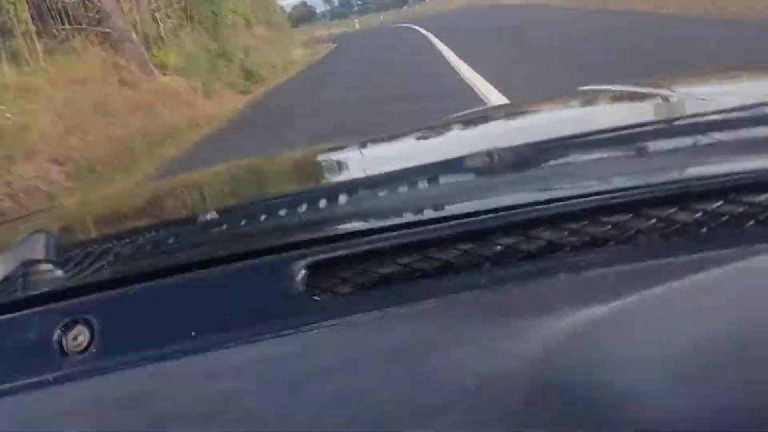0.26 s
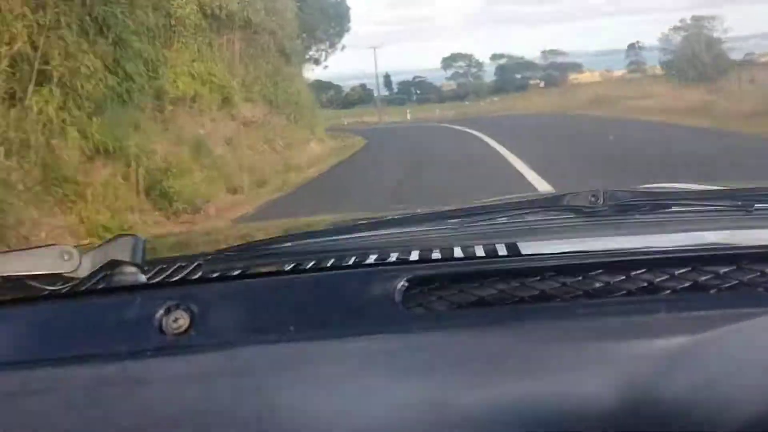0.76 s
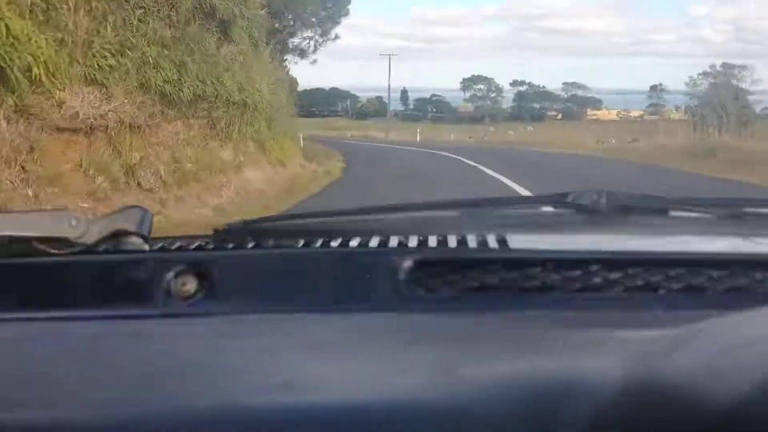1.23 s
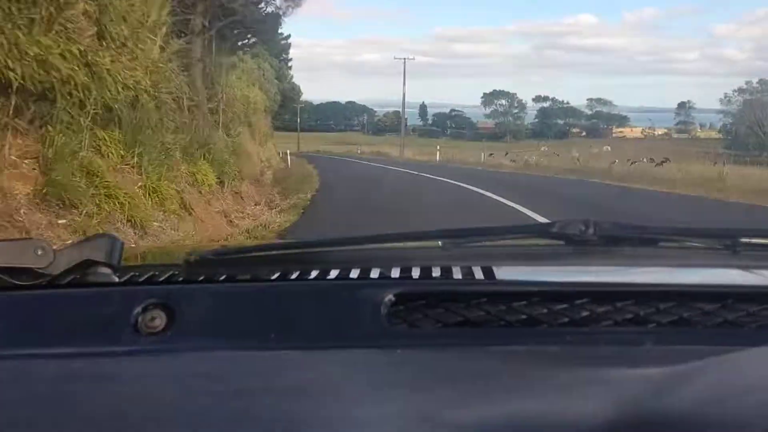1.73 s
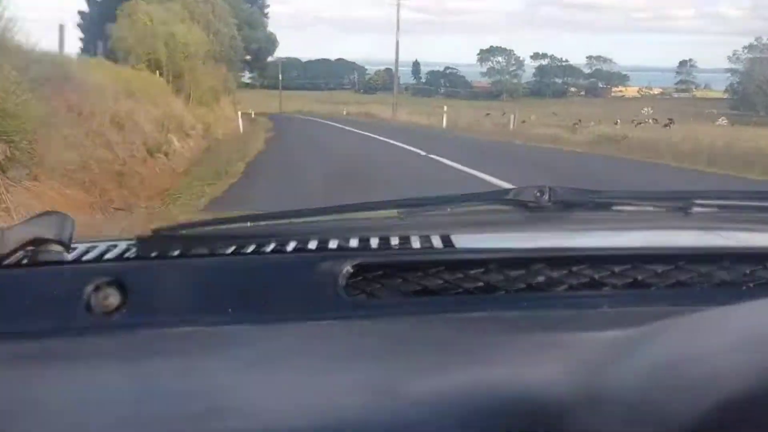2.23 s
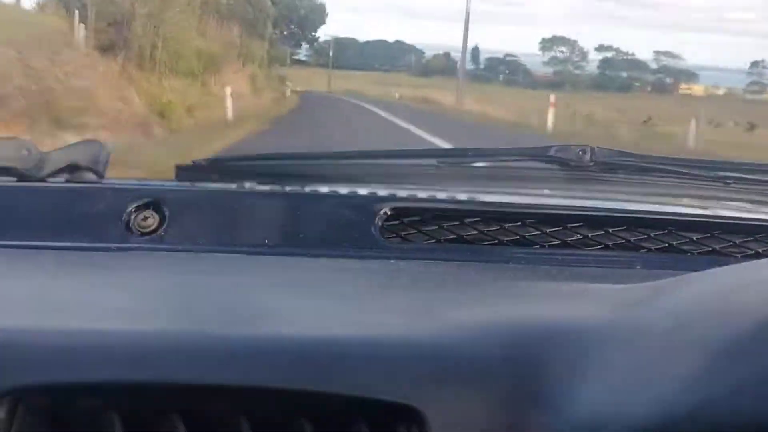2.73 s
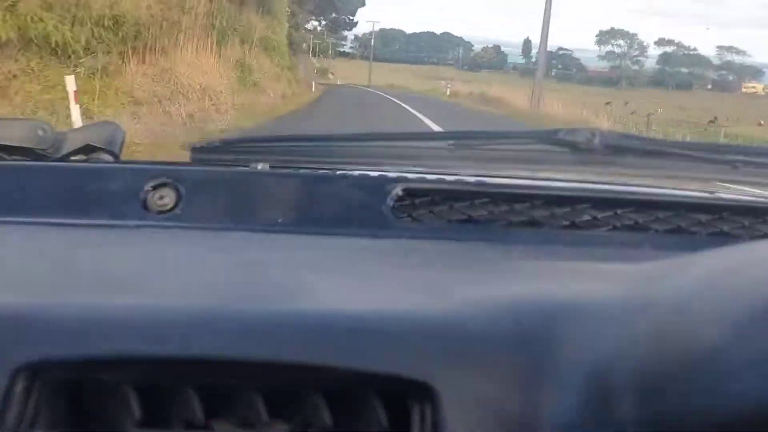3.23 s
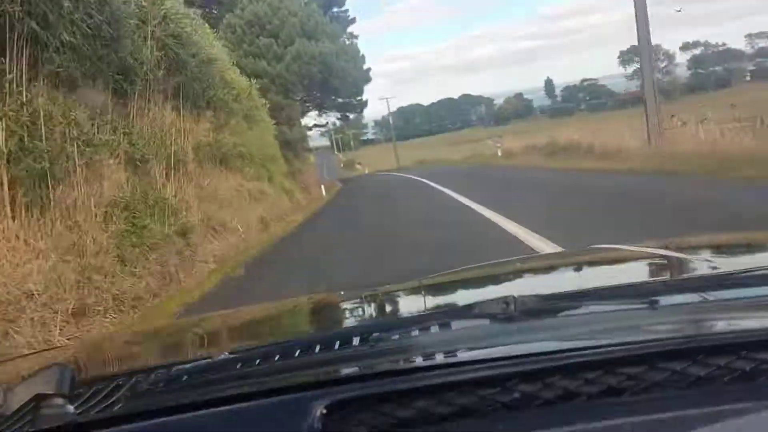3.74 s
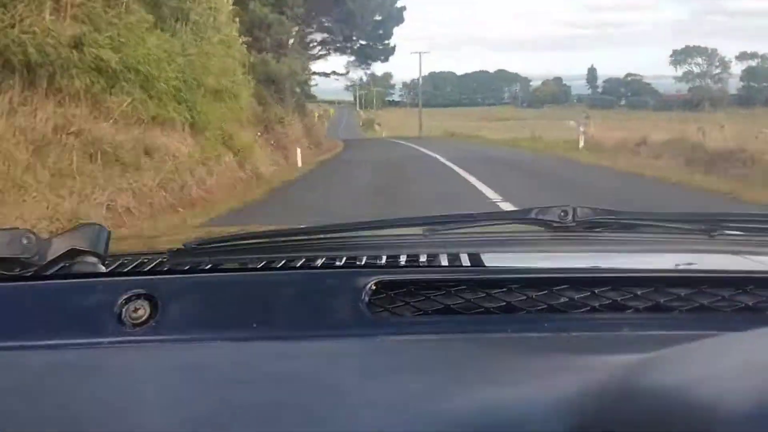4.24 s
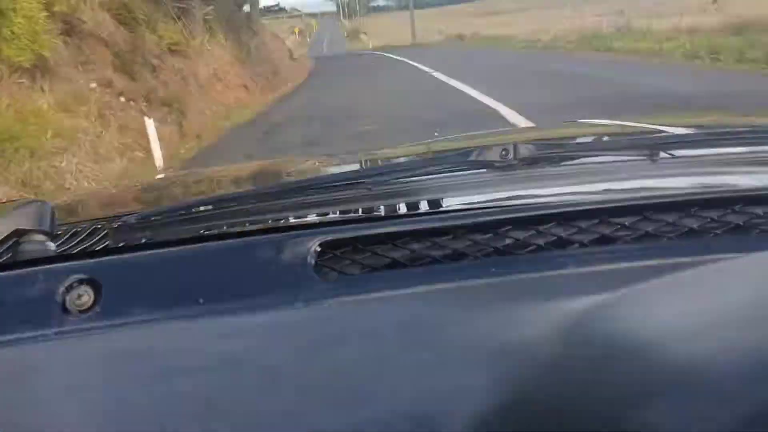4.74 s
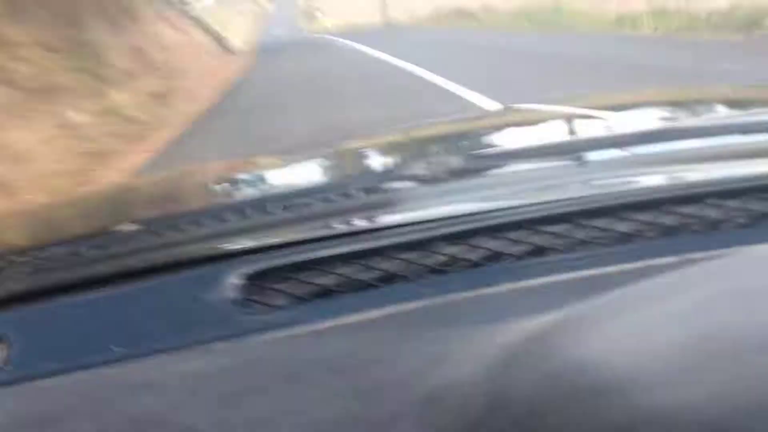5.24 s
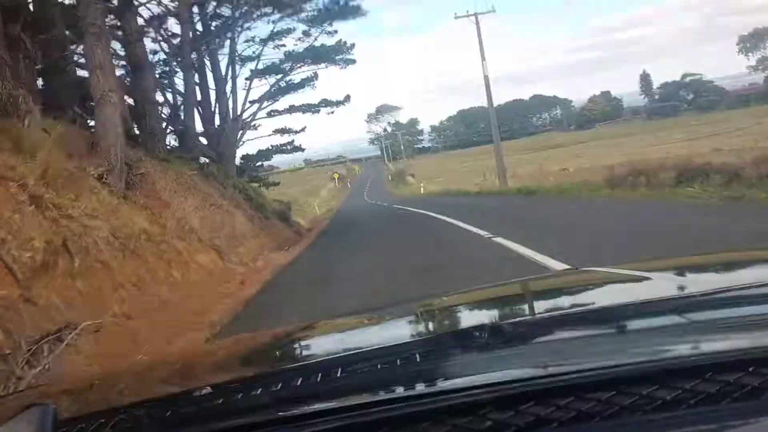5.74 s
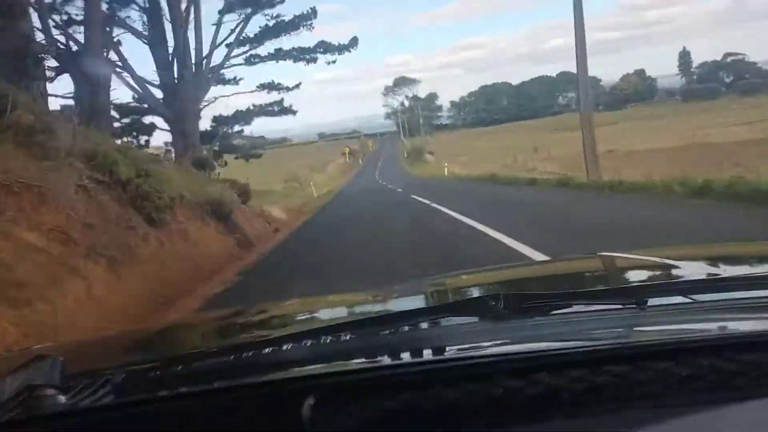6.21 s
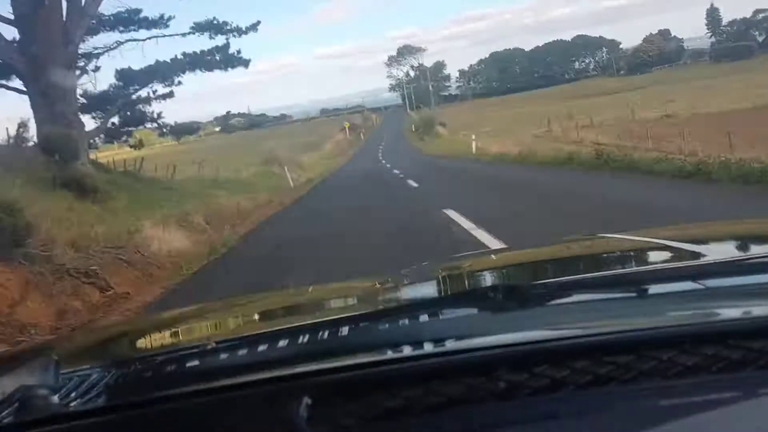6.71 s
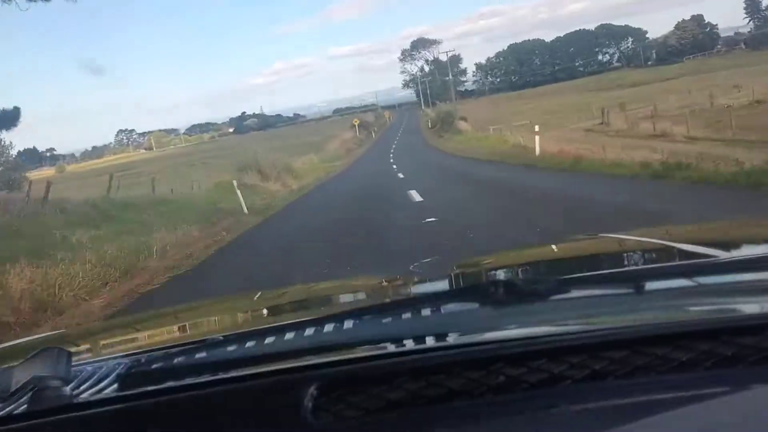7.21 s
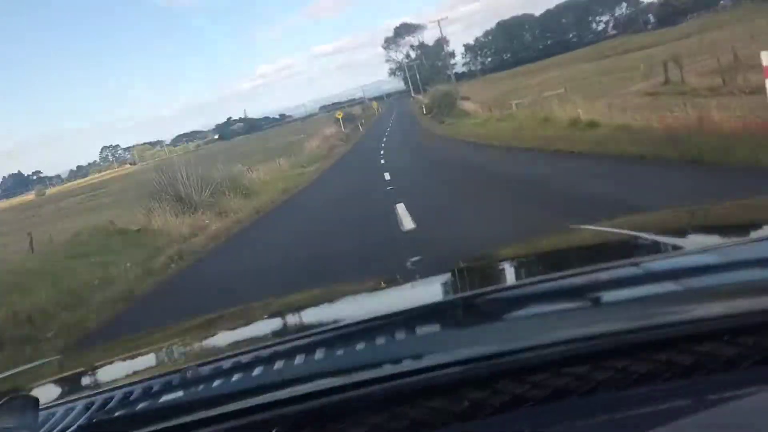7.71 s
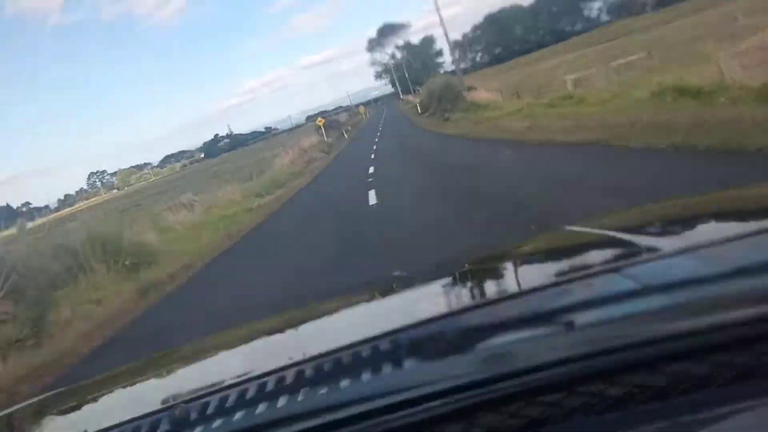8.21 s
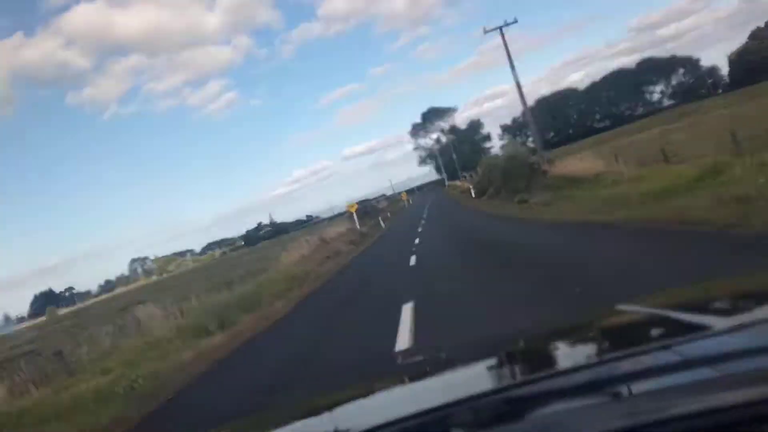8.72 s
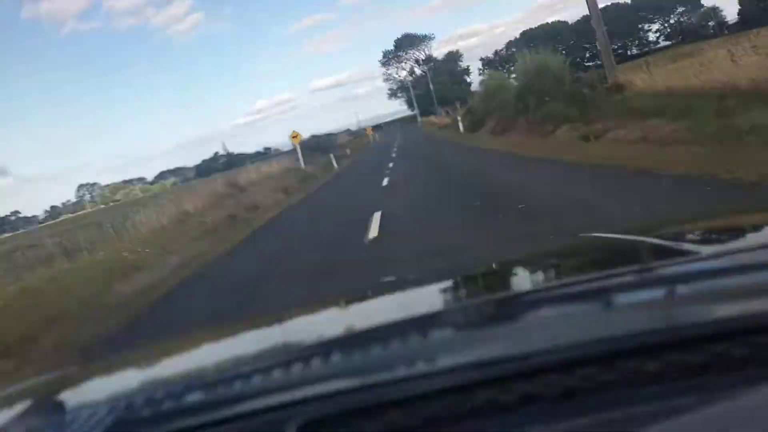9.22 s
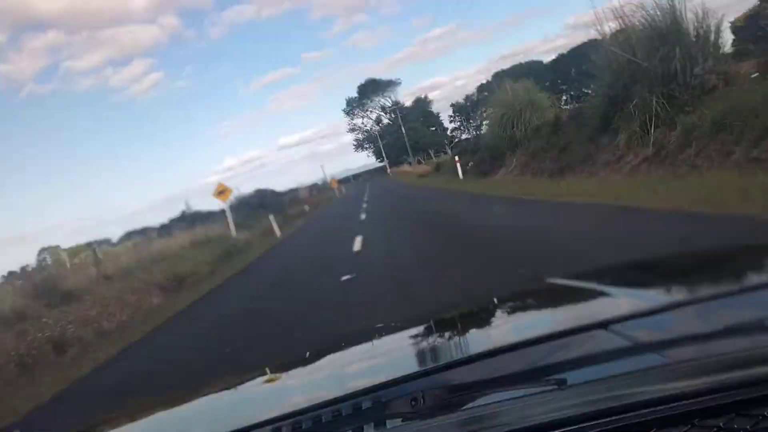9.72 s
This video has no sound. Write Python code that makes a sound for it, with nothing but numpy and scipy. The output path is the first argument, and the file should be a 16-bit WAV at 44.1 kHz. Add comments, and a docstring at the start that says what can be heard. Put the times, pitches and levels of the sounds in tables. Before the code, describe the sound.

Cabin of a rotary-engined car: coarse tyre noise while coasting, then the throttle opens and a harsh exhaust snarl rises in pitch without a gear change.

```python
"""Rotary-engined sports car, cabin sound

The car eases through a bend, then pulls hard in one gear. Engine orders are sines at multiples of the
firing rate, climbing through exhaust and cabin resonances; the rasp opens with the throttle at 3.2 s
and lets go for an instant at 5.2 s. The drive shaft throbs, gears whine faintly as blurred tones;
tyres on coarse tarmac, gas roar, hiss and wind are coloured noise; loose trim ticks twice."""
import sys
import numpy as np
from scipy import signal
from scipy.fft import rfft, irfft
from scipy.io import wavfile
from scipy.ndimage import uniform_filter1d, minimum_filter1d

SR = 44100
rng = np.random.default_rng(int(sys.argv[2]) if len(sys.argv) > 2 else 0)


def log_audio(samples):
    """Write samples as a 16-bit WAV file to the path given in sys.argv[1]."""
    # one column per channel
    frames = np.atleast_2d(samples).T
    # limit to full scale, then quantise
    limited = np.clip(frames, -1, 1)
    pcm = np.round(limited * 32767).astype(np.int16)
    wavfile.write(sys.argv[1], SR, pcm)


N = 439236
TIME = np.arange(N) / SR  # s
BINS_HZ = np.fft.rfftfreq(N, 1 / SR)

# Half lengths run from the centre of a bell to 1/e of its height.
# Engine speed: t/s, firing rate f/Hz
FIRING_RATE = [(0, 115.5), (.7, 114.8), (1.3, 116), (2.1, 118.6), (2.68, 120), (3.45, 125.4), (3.6, 127.1),
               (4, 130.2), (4.75, 137.3), (5.15, 141), (5.33, 144.4), (5.52, 144.3), (6.5, 153.9),
               (7.35, 162.4), (7.75, 166.8), (8.5, 174), (9.05, 179), (9.96, 185.7)]
# Engine load: t/s, level/dB
ENGINE_LOAD = [(0, -22), (1.2, -21), (1.6, -11.5), (3.1, -11.5), (3.2, -4), (3.36, 2.7), (3.52, -2.3),
               (3.8, 1.8), (4.2, -1.5), (4.55, 2), (5.1, 0.5), (5.35, 2.5), (5.9, 2), (6.45, 4), (6.7, 2.5),
               (8.6, 2), (9.7, 4), (9.96, -1.5)]
# Engine lets go of its pull for an instant: t/s, half length/s, load change/dB
LOAD_LIFTS = [(3.42, .02, -4), (4.67, 0.048, -5), (5.205, 0.056, -10.5), (7.385, 0.023, -3)]
# Low orders that boom: multiple of firing rate, level/dB, slope/(dB per octave of revs),
# fading on a light throttle/(dB per dB)
BOOM_ORDERS = [(1, -0.65, 1, 1.03), (1.5, -6.5, -8.5, 1.5), (2, 1.5, -1, 1.52), (2.5, -15, 12.5, 0.56),
               (3, 0.46, -1.5, 0.5)]
# Cabin air response to the low orders: f/Hz, level/dB
CABIN_AIR_RESPONSE = [(114, -18.5), (130, -20), (141, -25.5), (159, -20.5), (171, -24), (182, -19.5),
                      (215, -20.5), (240, -24.5), (272, -25), (294, -20.5), (306, -23.5), (317, -34),
                      (338, -29), (364, -42), (384, -26.5), (432, -30.5), (456, -37), (490, -35),
                      (550, -31)]
# Exhaust orders; unequal firing of the two rotors gives the half orders, and the pulse changes shape
# with revs: multiple of firing rate, level at low revs/dB, level at high revs/dB
RASP_ORDERS = [(3.5, -13.5, -9), (4, 5, 1), (4.5, -4, -5.5), (5, -3.5, -1), (5.5, -11.5, -3), (6, -2, 0),
               (6.5, -13, -16.5), (7, -5, -5), (7.5, -3.5, -10.5), (8, 0, 0.5), (8.5, -11, -6.5),
               (9, 1.5, -3.5), (9.5, -6.5, -8.5), (10, 1.5, -0.5), (10.5, -2.5, -5), (11, -3, 0),
               (11.5, -9, -10.5), (12, 0, -1), (12.5, -13, -4.5), (13, -9.5, 0), (13.5, -5, -6),
               (14, -2.5, -4.5), (14.5, -7, 2), (15, -9, 0.5), (15.5, -2, -2), (16, 0.5, -10.5),
               (16.5, -3, -4), (17, -4.5, 3), (17.5, -9, -0.5), (18, -11.5, -0.5)]
# Single orders that sing out: t/s, multiple of firing rate, half length/s, lift/dB
ORDER_HOWLS = [(3.3, 18, 0.2, 23), (3.817, 14, 0.18, 3.5), (3.87, 8.5, 0.17, 17), (4.41, 7, 0.44, 8.5),
               (4.42, 12.5, 0.3, 15), (4.807, 9.5, 0.15, 15), (5.445, 3.5, 0.35, 10),
               (6.206, 13, 0.34, 10.5), (6.306, 10, .2, 2.5), (6.86, 8.5, 0.19, 8),
               (7.105, 6.5, 0.66, 13.5), (7.9, 13.5, .35, 10.5), (8.723, 8, 0.24, 12.5),
               (8.95, 9, .28, 4.5), (9.56, 9.5, .45, 15.5)]
# Rough burning as the throttle opens: t/s, half length/s, roughness (0-1)
ROUGH_BURNS = [(3.2, 0.035, 0.5), (3.35, 0.05, 0.23), (5.3, 0.065, 0.28), (6.7, 0.034, 0)]
# Exhaust and cabin resonances: f/Hz, width/Hz, level/dB
CABIN_RESONANCES = [(449, 73, -36.5), (517, 110, -42), (638, 39, -36), (684, 56.0, -37.5), (752, 52, -35),
                    (794, 56, -36), (860.8, 38.3, -29.5), (940, 120, -43.5), (1000, 57.0, -43.5),
                    (1047, 37, -35.5), (1161, 110, -39.5), (1160, 17, -43), (1281, 110, -44.5),
                    (1383, 50, -42.5), (1518, 110, -41.5), (1591, 98, -42), (1705.0, 120, -49.5),
                    (1804, 15, -42), (1846, 81, -42.5), (1980, 110, -45.5), (2106, 210, -50.9),
                    (2307, 54, -50), (2410, 72, -48), (2760, 140, -62), (2776.0, 881.0, -70.5)]
# Resonances that buzz with the highest orders: f/Hz, width/Hz, level/dB
BUZZ_RESONANCES = [(2610, 58, -53.5), (3400, 290, -64.5), (3710, 110, -55.5), (4234, 90, -55.5),
                   (5100, 250, -61), (5700, 99, -60.5)]
# Exhaust gas roar spectrum: f/Hz, relative density/dB
ROAR_SPECTRUM = [(200, -28), (400, 6.5), (750, 1.5), (1100, 0), (1600, -5), (2000, -14), (2450, -12.5),
                 (2900, -26), (3700, -34.5), (4400, -21.5), (5500, -29), (8000, -31)]
# Floor pan resonances, shaken by the drive shaft: f/Hz, width/Hz, level/dB
FLOOR_PAN_RESONANCES = [(43.15, 9, -18.5), (55, 50, -26.5)]
# Gear whine: t/s, level/dB
WHINE_LEVEL = [(1.5, -60), (2.4, -51), (3.3, -58), (4.6, -48), (5.2, -57), (5.85, -47), (6.4, -58),
               (7.25, -56), (7.6, -65)]
# Tarmac coarseness: t/s, level/dB
TARMAC_COARSENESS = [(0, -0.5), (1.2, 0), (3.3, -1.5), (3.9, -1.5), (5, -2.5), (6.7, 2), (7.8, 2),
                     (9.96, -.5)]
# Bumps and coarse patches: t/s, half length/s, change of rushing sounds/dB, change of body rumble/dB
ROAD_BUMPS = [(0.157, 0.023, 4, 2), (0.416, 0.053, 3.5, 0), (0.736, 0.024, 2, 6.5), (0.931, 0.025, 6.5, -4),
              (1.23, 0.058, 4.5, 4), (1.593, 0.096, 3.5, -4.5), (2.226, .03, 4.5, -9),
              (2.435, 0.043, 5.5, 9.5), (2.578, 0.022, 9, 12), (2.765, 0.048, 2.5, 5.5),
              (2.912, 0.062, 6, 2.5), (3.38, 0.11, 4, 3), (4.832, 0.05, 4, -18), (5.182, .05, -0.5, 4),
              (5.326, .04, 4.5, 5), (5.72, 0.027, 4, 7.5), (6.08, 0.034, 3.5, -10), (6.57, 0.069, 2.2, 3.5),
              (6.752, 0.034, 4.5, -11), (7.286, 0.055, 2.5, -2), (7.624, 0.3, 0.5, -1.5),
              (8.364, 0.033, 2, -1), (8.676, 0.049, 4, -1), (8.99, 0.036, 4.5, -2), (9.533, .04, 4.5, 0),
              (9.73, 0.072, 2.5, 1)]
# Body rumble spectrum: f/Hz, relative density/dB
RUMBLE_SPECTRUM = [(5, -34.5), (16, 3.5), (28, 7.5), (38, 9.5), (48, 1), (65, -4), (90, -1), (115, -25.5),
                   (200, -61)]
# Tyre noise spectrum: f/Hz, relative density/dB
ROAD_SPECTRUM = [(50, -26), (100, 1), (150, -1.5), (250, 0), (330, -5.5), (450, -10), (560, -14),
                 (700, -9.5), (950, -12.5), (1150, -17), (1400, -26.5), (1950, -23.5), (2400, -33.5),
                 (2900, -56.5)]
# Air hiss: t/s, level/dB
HISS_LEVEL = [(0, -45.5), (1, -41.5), (1.6, -40), (3.05, -40.5), (3.5, -38.5), (4.7, -35.5), (5.12, -37),
              (5.17, -42), (5.28, -36), (5.8, -33.5), (7, -37), (8.3, -36.5), (9.96, -36)]
# Air hiss spectrum, also used by the ticks: f/Hz, relative density/dB
HISS_SPECTRUM = [(1500, -34), (3000, -38.5), (3500, -29), (4100, -12.5), (4800, -14), (5600, -18),
                 (6200, -10), (6900, -2.5), (7300, -2.5), (7600, 0.5), (7900, -6.5), (8200, -17.5),
                 (8500, -29.5)]
# Windscreen wind spectrum: f/Hz, relative density/dB
WIND_SPECTRUM = [(800, 1), (1400, -11), (2000, 4), (2500, -3), (2900, -11), (3400, -5.5), (4100, -0.5),
                 (5000, -1.5), (5600, -1), (6200, 3.5), (7200, -2), (8300, -25)]
# Something loose in the cabin ticks: t/s, level/dB
TRIM_TICKS = [(5.217, -25), (7.44, -32)]
# Brief dips of all but the ticks: t/s, half length/s, level/dB
LEVEL_DIPS = [(.09, .025, -3), (.31, 0.055, -3), (2.275, 0.011, -4), (3.42, 0.013, -4.5), (7.37, 0.03, -4)]

CRUISE_HZ, LOW_REVS_HZ, HIGH_REVS_HZ = 115, 128, 182  # firing rates
SHAFT_TURNS_PER_FIRING, MESH_TURNS_PER_FIRING = 0.376, 17.1
RASP_FLUTTER = 0.12  # share of each order's amplitude
EDGE_HZ = 8450  # upper band limit


def boom(turns, firing_hz, octaves, load_db, slack_db, follow, flutter, coasting_flutter, half_order_db):
    """Low orders drone across cabin air resonances; on a light throttle they fade and burn less evenly."""
    unsteady = flutter + coasting_flutter * (1 - np.minimum(gain_of(load_db), 1))
    fade_db = follow * load_db - 10 * np.log10(1 + gain_of(slack_db - load_db) ** 2)
    air_hz, air_level_db = np.transpose(CABIN_AIR_RESPONSE)
    drone = np.zeros(N)
    for k, db, db_per_octave, fading in BOOM_ORDERS:
        air_db = np.interp(k * firing_hz, air_hz, air_level_db)
        order_db = db + db_per_octave * octaves + air_db + fading * fade_db
        drone += gain_of(order_db) * tone(k * turns) * (1 + unsteady * wander(15.5))
    return drone + gain_of(half_order_db) * tone(turns / 2)


def rasp(turns, firing_hz, load_db, level_db, shudder):
    """Higher orders swell and fade through the resonances; rough burning smears them."""
    cabin = response(CABIN_RESONANCES)
    rough = humps(ROUGH_BURNS)
    revs = np.clip((firing_hz - LOW_REVS_HZ) / (HIGH_REVS_HZ - LOW_REVS_HZ), 0, 1)
    out = np.zeros(N)
    for k, low_db, high_db in RASP_ORDERS:
        howl_db = humps([(s, half_s, db) for s, which, half_s, db in ORDER_HOWLS if which == k])
        order_db = low_db + revs * (high_db - low_db) + howl_db
        unsteady = 1 + RASP_FLUTTER * wander(5.7) + rough * (wander(45) - 1 / 2)
        out += gain_of(order_db) * np.interp(k * firing_hz, BINS_HZ, cabin) * tone(k * turns) * unsteady
    return gain_of(level_db + load_db) * out * (1 + shudder * wander(29))


def buzz(turns, firing_hz, load_db, level_db, flutter, speed_power):
    """Under load and at high revs the sharp edge of each exhaust pulse reaches into the treble."""
    panels = response(BUZZ_RESONANCES)
    out = np.zeros(N)
    for k in np.arange(17, 38, 0.5):
        panel_gain = np.interp(k * firing_hz, BINS_HZ, panels)
        out += panel_gain * tone(k * turns) * (1 + flutter * wander(9.7))
    return gain_of(level_db + load_db) * (firing_hz / firing_hz.max()) ** speed_power * out


def roar(turns, load_db, level_db, follow, pulsing, uneven, snarl_db):
    """Each firing throws out a puff of turbulent gas, one rotor's stronger than the other's."""
    puffs = np.exp(pulsing * np.cos(2 * np.pi * turns) + uneven * np.cos(np.pi * turns))
    roar_db = level_db + follow * load_db + snarl_db * humps(ROUGH_BURNS)
    return gain_of(roar_db) * evened(puffs) * noise(ROAR_SPECTRUM)


def drivetrain(turns, firing_hz, load_db, throb_db, damping, overtone_db, upper_db):
    """The shaft shakes the floor pan once a turn, most when slack; meshing teeth add two blurred whines."""
    shaft = SHAFT_TURNS_PER_FIRING * turns
    pan_gain = np.interp(SHAFT_TURNS_PER_FIRING * firing_hz, BINS_HZ, response(FLOOR_PAN_RESONANCES))
    shake = gain_of(throb_db - damping * load_db) * pan_gain * (1 + 0.1 * wander(8))
    throb = shake * (tone(shaft) + gain_of(overtone_db) * tone(2 * shaft))
    mesh = MESH_TURNS_PER_FIRING * turns
    lower = whistle(2 * mesh, blur_hz=65)
    upper = whistle(3 * mesh, blur_hz=80)
    return throb + gain_of(curve(WHINE_LEVEL)) * (lower + gain_of(upper_db) * upper)


def tyres(tarmac_db, surge_db, rumble_db, rumble_share, road_db, grain_db, share):
    """Bumps shake the body; stone chips in the tarmac make the tyre noise grainy."""
    thump_db = humps([(s, half_s, db) for s, half_s, _, db in ROAD_BUMPS])
    rumble = gain_of(rumble_db + rumble_share * tarmac_db + thump_db) * noise(RUMBLE_SPECTRUM)
    grainy_db = road_db + tarmac_db + share * surge_db + grain_db * wander(50)
    return rumble + gain_of(grainy_db) * noise(ROAD_SPECTRUM)


def hiss(turns, surge_db, level_db, flicker_db, pulsing):
    """Rushing air, flickering and lightly shaken by the engine."""
    shake = 1 + pulsing * np.cos(2 * np.pi * turns)
    hiss_db = level_db + curve(HISS_LEVEL) + surge_db + flicker_db * wander(72)
    return gain_of(hiss_db) * shake * noise(HISS_SPECTRUM)


def wind(octaves, tarmac_db, surge_db, level_db, db_per_octave, gust_db, tarmac_share, share):
    """Air round the windscreen grows with road speed, and swells with the other rushing sounds."""
    swell_db = tarmac_share * tarmac_db + share * surge_db + gust_db * wander(36)
    return gain_of(level_db + db_per_octave * octaves + swell_db) * noise(WIND_SPECTRUM)


def ticks(decay_s):
    """Short, bright scrapes of loose trim: sudden onset, exponential decay."""
    envelope = np.zeros(N)
    for s, db in TRIM_TICKS:
        envelope += gain_of(db) * (TIME > s) * np.exp(-abs(TIME - s) / decay_s)
    return envelope * noise(HISS_SPECTRUM)


def surges(uneven_db, rate_hz):
    """Shared level of the rushing sounds (dB): shifts at bumps, lesser unevenness between."""
    bump_db = humps([(s, half_s, db) for s, half_s, db, _ in ROAD_BUMPS])
    return bump_db + uneven_db * wander(rate_hz)


def tone(turns):
    """A sine of rms 1 with a random start phase."""
    return np.sqrt(2) * np.sin(2 * np.pi * (turns + rng.random()))


def whistle(turns, blur_hz):
    """A tone of rms about 1, smeared into a narrow band by random quadrature amplitudes."""
    in_phase = wander(blur_hz) * np.cos(2 * np.pi * turns)
    return in_phase + wander(blur_hz) * np.sin(2 * np.pi * turns)


def noise(spectrum):
    """Noise of rms 1 with the given spectrum, interpolated over log frequency."""
    hz, db = np.transpose(spectrum)
    shape = gain_of(np.interp(np.log(BINS_HZ + 1), np.log(hz), db))
    return evened(irfft(rfft(rng.standard_normal(N)) * shape, N))


def wander(rate_hz):
    """Smooth random signal of rms about 1, its spectrum halved at rate_hz and steep above."""
    steps = rng.standard_normal(4096)
    hz = np.fft.rfftfreq(len(steps), TIME[-1] / len(steps))
    slow = evened(irfft(rfft(steps) / (1 + (hz / rate_hz) ** 4)))
    return np.interp(TIME, np.linspace(0, TIME[-1], len(slow)), slow)


def response(resonances):
    """Gain at every frequency bin of resonances summed in power."""
    power = np.zeros(len(BINS_HZ))
    for hz, width_hz, db in resonances:
        power += gain_of(db) ** 2 / (1 + (2 * (BINS_HZ - hz) / width_hz) ** 2) ** 2
    return np.sqrt(power)


def curve(rows):
    """A control table interpolated at every sample."""
    s, level = np.transpose(rows)
    return np.interp(TIME, s, level)


def humps(rows):
    """Sum of bells from rows of (t/s, half length/s, height)."""
    s = np.linspace(0, TIME[-1], 4096)
    total = np.zeros(len(s))
    for at_s, half_s, height in rows:
        total += height * np.exp(-((s - at_s) / half_s) ** 2)
    return np.interp(TIME, s, total)


def gain_of(db):
    """Decibels to amplitude."""
    return 10 ** (np.asarray(db) / 20)


def evened(x):
    """Scales to rms 1."""
    return x / np.sqrt(np.mean(x ** 2) + 1e-20)


def scene():
    """One engine speed turns everything; in one gear, road speed follows it (octaves above cruising)."""
    firing_hz = curve(FIRING_RATE) * (1 + 0.000706 * wander(17.8))
    turns = np.cumsum(firing_hz) / SR  # one turn per firing
    octaves = np.log2(firing_hz / CRUISE_HZ)
    load_db = curve(ENGINE_LOAD) + humps(LOAD_LIFTS)
    tarmac_db = curve(TARMAC_COARSENESS)
    surge_db = surges(uneven_db=1.0, rate_hz=15)
    engine = boom(turns, firing_hz, octaves, load_db, slack_db=-18.5, follow=0.16,
                  flutter=0.13, coasting_flutter=0.26, half_order_db=-42.5)
    engine += rasp(turns, firing_hz, load_db, level_db=1.5, shudder=0.14)
    engine += buzz(turns, firing_hz, load_db, level_db=2.5, flutter=0.34, speed_power=2.4)
    engine += roar(turns, load_db, level_db=-36.5, follow=0.93, pulsing=0.52, uneven=0.081, snarl_db=18)
    drive = drivetrain(turns, firing_hz, load_db, throb_db=-0.5, damping=0.13,
                       overtone_db=-23.5, upper_db=2.5)
    rush = tyres(tarmac_db, surge_db, rumble_db=-20.0, rumble_share=0.5,
                 road_db=-28.5, grain_db=2.0, share=0.94)
    rush += hiss(turns, surge_db, level_db=-0.2, flicker_db=1.0, pulsing=0.078)
    rush += wind(octaves, tarmac_db, surge_db, level_db=-47.5, db_per_octave=12.5,
                 gust_db=2, tarmac_share=1.1, share=1.0)
    dipped = gain_of(humps(LEVEL_DIPS)) * (engine + drive + rush)
    return (dipped + ticks(decay_s=0.005))[None]


def limiter(x, ceiling_db, recovery_db_per_s):
    """Turns the gain down at each peak above the ceiling and lets it creep back."""
    over_db = np.maximum(20 * np.log10(abs(x).max(0) + 1e-9) - ceiling_db, 0)
    fall_db = TIME * recovery_db_per_s
    held_db = np.maximum.accumulate(over_db + fall_db) - fall_db
    widened_db = -minimum_filter1d(-held_db, size=89)  # starts turning down ahead of the peak
    return x / gain_of(uniform_filter1d(widened_db, size=89))


def record(dry):
    """Peak limiter, then a linear-phase low-pass as band limit."""
    held = limiter(dry, ceiling_db=-6, recovery_db_per_s=55.0)
    low_pass = signal.firwin(511, EDGE_HZ, window=("kaiser", 9), fs=SR)
    return signal.oaconvolve(held, low_pass[None], "same")


dry = scene()
out = record(dry)
log_audio(out)
```